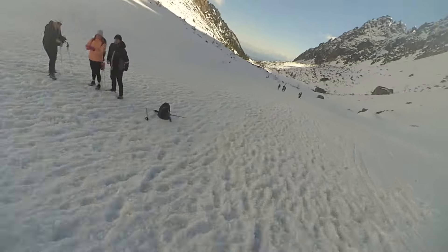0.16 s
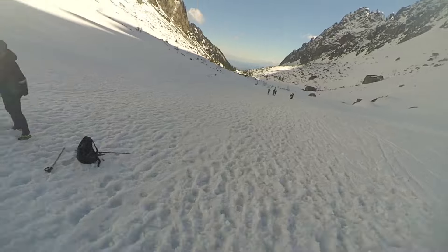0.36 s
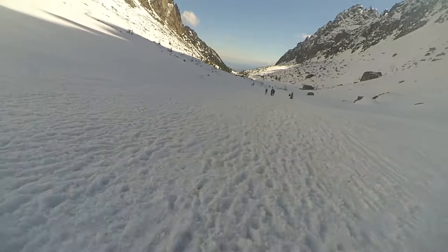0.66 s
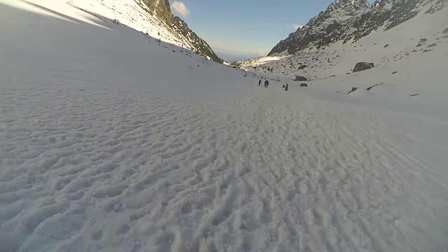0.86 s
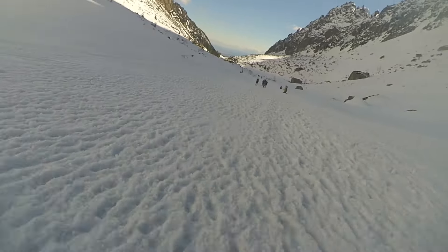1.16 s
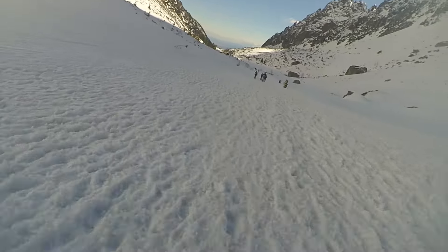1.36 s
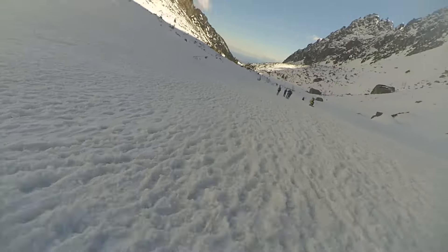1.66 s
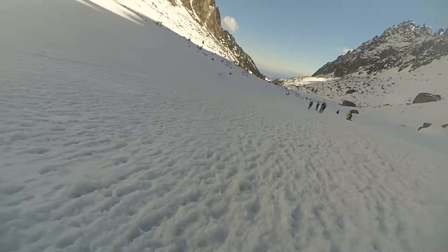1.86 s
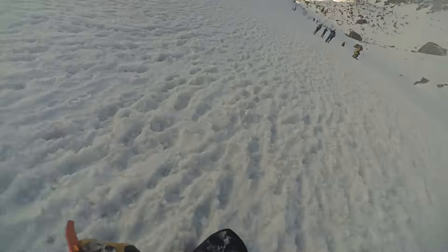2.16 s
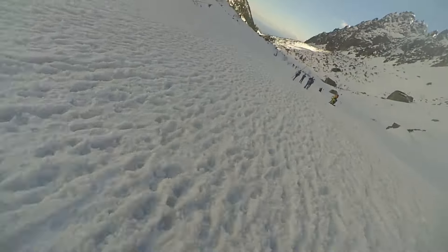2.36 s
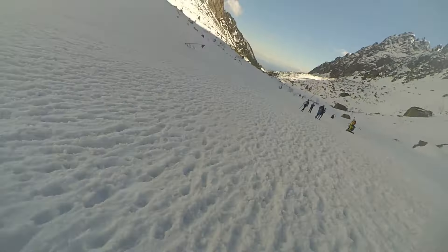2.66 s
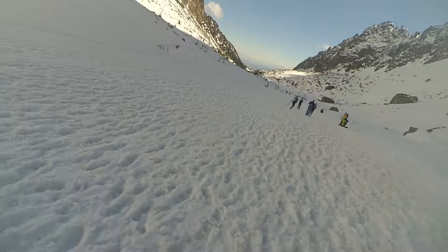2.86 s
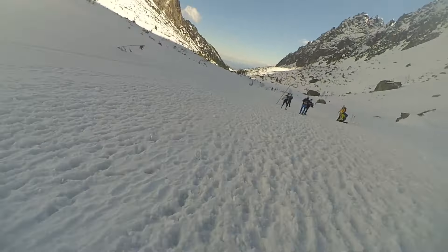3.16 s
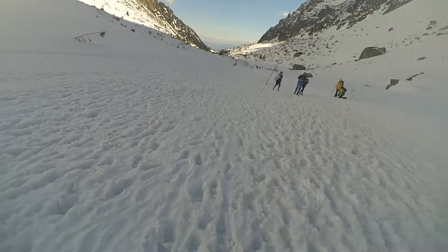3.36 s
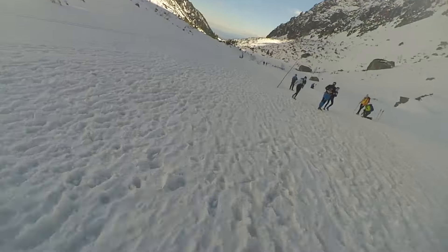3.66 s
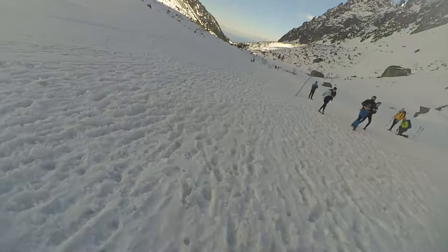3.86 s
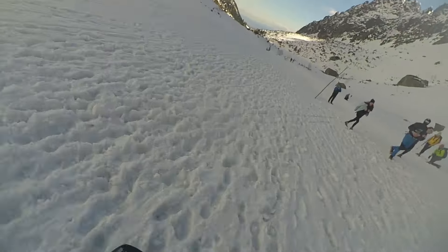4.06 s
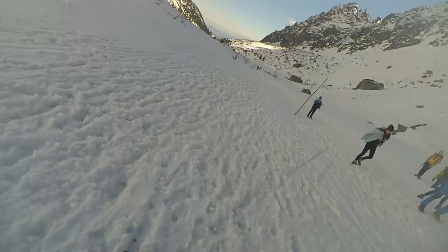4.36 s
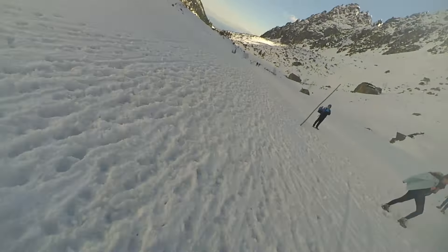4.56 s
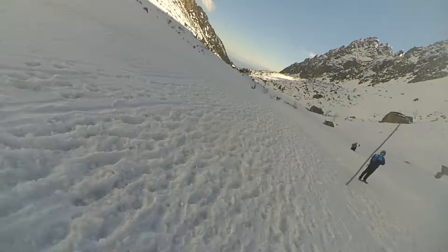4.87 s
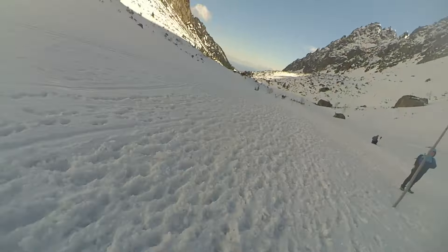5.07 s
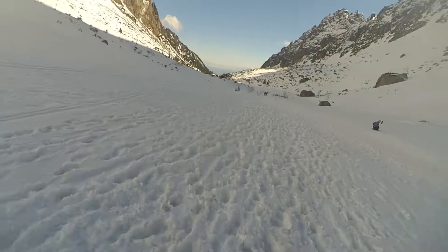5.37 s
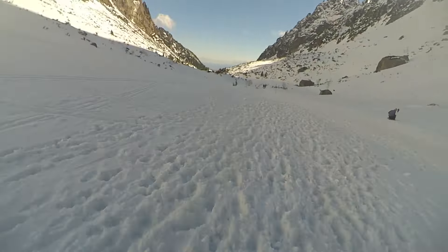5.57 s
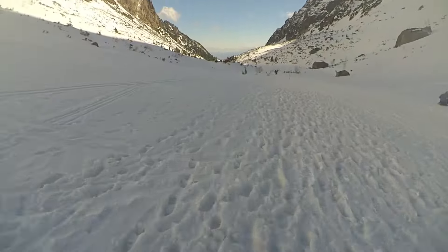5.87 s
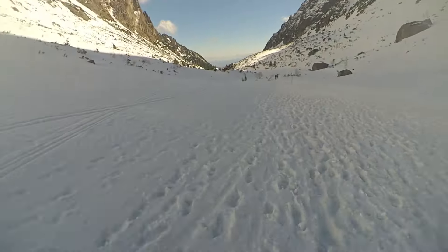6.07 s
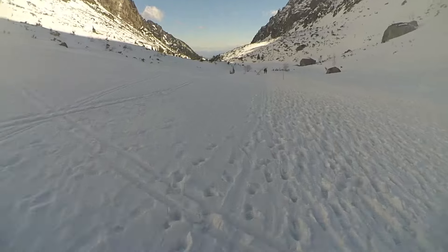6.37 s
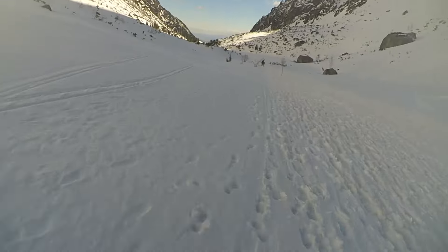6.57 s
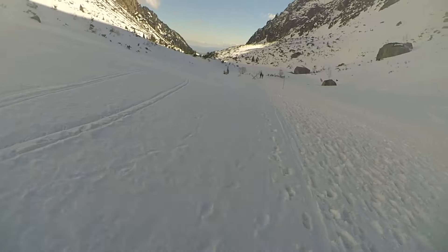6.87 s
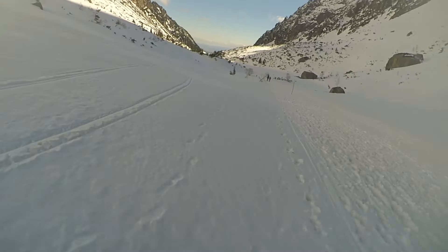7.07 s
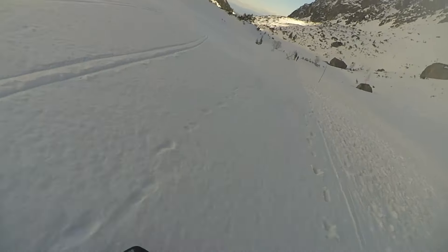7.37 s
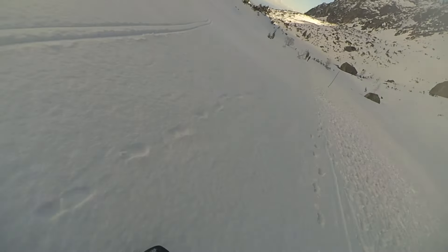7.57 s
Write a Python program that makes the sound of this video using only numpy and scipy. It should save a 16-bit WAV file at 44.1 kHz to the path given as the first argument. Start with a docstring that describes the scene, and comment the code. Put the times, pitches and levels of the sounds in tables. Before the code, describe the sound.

A skier carves over trampled, crusty snow in the open, heard nearly mono from a small microphone in a closed case. From 0 to 1 s, grainy hiss and low scraping run under a burst of dry crust cracks, with wind slapping the case. Around 1.1 s the turn changes and the hiss becomes brighter and smoother, swelling to its strongest near 2-2.4 s, while deep gusts thump hard at about 1.6-2.1 s. From 2.7 s the hiss is duller and rougher, with a board bump near 2.9 s. The brighter edge sound returns at 3.6 s, rising around 4.4 s with another heavy gust at 4.5 s. After 5.1 s it is grainier and quieter, with a bump, brief skips and scattered cracks. From 6.6 s the cracks stop after one last snap; soft hiss, faint scrape and a subdued rumble continue to 7.6 s.

```python
"""Skiing over crusty snow

A skier swings from turn to turn over trampled, crusty snow with a small camera in a closed case.
Wind pumps the case in a deep rumble: noise bands under drawn gusts, with a patchy drone.
Skis hiss, drag and shudder with edge load: noise, part smooth and part snapping grains.
Breaking crust cracks in short noise puffs. Each turn rings the case from its own side,
so hiss and cracks take that turn's own resonances."""
import sys
import numpy as np
from scipy import signal
from scipy.fft import rfft, irfft, next_fast_len
from scipy.io import wavfile
from scipy.ndimage import uniform_filter1d

SR = 44100
rng = np.random.default_rng(int(sys.argv[2]) if len(sys.argv) > 2 else 0)


def store_wav(level_fs):
    """Save 16-bit WAV to argv[1]."""
    pcm = np.round(np.clip(np.atleast_2d(level_fs), -1, 1) * 32767)
    wavfile.write(sys.argv[1], SR, pcm.T.astype(np.int16))


N = 340011

# Relative spectra of the wind in the case, deep to higher [f/Hz, level/dB per Hz]
HEAVE_SPECTRUM = [(3, -7.5), (5, 2), (14, 1), (20, -12), (30, -36)]
THROB_SPECTRUM = [(10, -36.5), (18, 2.5), (34, -6.5), (46, -11), (65, -64)]
FLUTTER_SPECTRUM = [(30, -11), (45, -1), (62, -11), (84, -18.5), (110, -52)]
DRONE_SPECTRUM = [(65, -26), (88, -1), (114, -1), (140, -18.5), (180, -47)]
# Relative spectrum of the rumble that differs between the channels [f/Hz, level/dB per Hz]
TRACE_SPECTRUM = [(12, -21), (20, 13), (33, -10), (77, -26), (141, -45), (299, -55), (650, -64),
                  (1030, -75), (4000, -84), (5200, -114), (8800, -120)]
# Relative spectra of the shuddering boards and dragging skis [f/Hz, level/dB per Hz]
SHUDDER_SPECTRUM = [(110, -5), (150, 2), (210, 2.5), (300, -4), (420, -23.5)]
DRAG_SPECTRUM = [(200, -29), (350, -9), (580, -6.5), (720, -13.5), (900, -3), (1130, -0.5), (1350, -9),
                 (1800, -55)]
# Broad colour of the hiss in the one turn and the opposite turn [f/Hz, level/dB per Hz]
ONE_SPECTRUM = [(700, -23.5), (1300, -10.5), (1800, -4), (2600, -5), (3100, -11.5), (3600, -10),
                (4500, -14.5), (6000, -15), (8000, -22), (8500, -22.5), (10300, -22.5), (12000, -30),
                (15500, -37)]
OTHER_SPECTRUM = [(700, -33), (1300, -15), (1900, -14.5), (2500, -11.5), (3100, -15), (3600, -8.5),
                  (4500, -10), (4900, -17), (6000, -26.5), (7200, -33), (9500, -34), (12000, -39.5),
                  (15500, -43)]
# Case resonances in the one turn and the opposite turn [f/Hz, width/Hz, lift/dB]
ONE_MODES = [(1650, 140, 10.5), (2097, 234, 6.3), (3752, 1150, 14), (5330, 214, 8.7), (6515, 145, 9),
             (7390, 710, 5.4), (8080, 290, 4.6)]
OTHER_MODES = [(1570, 270, 7), (2170, 410, 5.9), (2803, 170, 11.3), (3856, 310, 8), (4285, 190, 7.5),
               (6580, 360, 8), (8340, 300, 3.4), (8900, 540, 6), (10700, 330, 2.5)]

# Slow pumping of the case by the wind [t/s, level/dB]
HEAVE_LEVEL = [(0, -24.5), (.97, -19), (1.09, -25.5), (1.42, -31.5), (1.6, -7.5), (1.87, -6), (1.97, -19),
               (2.1, -8.5), (2.4, -18.5), (2.6, -18), (2.75, -24.5), (2.88, -14.5), (3.18, -27.5),
               (3.52, -22), (3.95, -31.5), (4.12, -17.5), (4.27, -24), (4.51, -11), (4.74, -24),
               (5.22, -28), (5.37, -21.5), (6.4, -25.5), (6.75, -33.5), (7.6, -29.5)]
# Quicker flutter of the wind [t/s, level/dB]
FLUTTER_LEVEL = [(0, -34.5), (.6, -39.5), (.9, -36), (1.07, -44.5), (1.35, -35), (1.6, -31.5),
                 (1.95, -28.5), (2.4, -39.5), (2.58, -43.5), (2.75, -34), (2.9, -41.5), (2.99, -31.5),
                 (3.1, -41), (3.35, -28.5), (3.5, -41), (4.1, -30.5), (5.0, -40), (5.43, -39.5),
                 (5.62, -34.5), (6.05, -43), (6.21, -38), (6.59, -44), (7.05, -39), (7.6, -47)]
# Single wind slaps that make the case throb [middle t/s, level/dB]
SLAPS = [(.13, -29), (.36, -22.5), (.56, -22.5), (.88, -19.5), (1.45, -21.5), (1.6, -7.5), (1.75, -12),
         (1.97, -12.5), (2.36, -20), (2.8, -27.5), (3.02, -24), (3.28, -19), (4.0, -23.5), (4.27, -25),
         (4.51, -13.5), (4.8, -23.5), (5.37, -27.5), (5.6, -21.5), (6.31, -29), (6.68, -27.5)]
# How hard the edges press the snow, as hiss level [t/s, level/dB]
LOAD = [(0, -39), (.6, -39.5), (.98, -39.5), (1.15, -39.5), (1.4, -38), (1.7, -36), (2.0, -33),
        (2.4, -33.5), (2.6, -40.5), (2.85, -40.5), (3.1, -44), (3.35, -41), (3.8, -45), (4.0, -40.5),
        (4.15, -40), (4.36, -36), (4.6, -41), (4.88, -40.5), (5.05, -46.5), (5.38, -42), (5.55, -41),
        (5.7, -42), (5.95, -42), (6.14, -40.5), (6.32, -43.5), (6.55, -46), (6.8, -50.5), (6.93, -45.5),
        (7.05, -47.5), (7.22, -42), (7.64, -44)]
# Brief skips of the skis off the snow [middle t/s, half length/s, drop/dB]
SKIPS = [(0.696, 0.043, 5), (1.053, 0.034, 4.5), (1.207, 0.018, 3.5), (2.349, 0.018, 2.5),
         (2.598, 0.043, 3), (3.65, 0.025, 6.5), (4.18, .03, 4), (5.086, 0.019, 2), (5.298, 0.024, 4),
         (5.474, 0.05, 5), (6.07, 0.042, 5), (6.218, 0.031, 8.5), (6.606, 0.0093, 4)]
# Turns [start t/s, side: 1 the one turn, 0 the opposite turn]
TURNS = [(0, 0), (1.12, 1), (2.72, 0), (3.6, 1), (5.12, 0), (6.6, 1)]
# Changing snow, levels at the middle load and flutter [t/s, drag level/dB, shudder level/dB]
SNOW = [(0, -56, -57.5), (1, -54.5, -57), (2.4, -55, -60.5), (3.4, -51.5, -57), (4.4, -53, -62.5),
        (5.6, -53.5, -61), (6.6, -54, -62), (7.6, -54, -60.5)]
# Bigger bumps under the boards [t/s, peak level/dB]
BUMPS = [(0.526, -41), (1.596, -44), (1.881, -50), (2.126, -49), (2.232, -51), (2.947, -35.5), (4.477, -48),
         (4.861, -44), (5.076, -39), (6.741, -44)]
# Breaking crust, each part before its lift [t/s, level of the top/dB, thud, body, ring against it/dB]
CRACKS = [(0.0714, -22.5, -25, -17, -6), (0.106, -22, -38, -18, -9), (0.138, -17.5, -40, -15, -12.5),
          (0.2394, -30, -19, -9, -6), (0.259, -32, -34, -18, -1), (0.3033, -30, -29, -10, -2),
          (0.39, -19, -34, -15, -12), (0.856, -23, -26, -18, -5), (0.9038, -29, -26, -21, -3),
          (0.9517, -22.5, -23, -16, -17), (1.0797, -22.5, -28, -17, -15), (1.7035, -19, -17.5, -7, -22),
          (1.9081, -17, -25, -10, -15), (1.944, -17, -29, -10.5, -10.5), (2.361, -28, -18, -2, -18),
          (2.6688, -27.5, -21, 1, -33), (2.7246, -26, -13, -9, -10), (2.7631, -24, -28, -14.5, -12),
          (2.8887, -26.5, -28, -8.5, -0.5), (3.0493, -30, -25, -10, -7.5), (3.3495, -27, -20, -7, -14),
          (3.4037, -22.5, -23, -16, -17), (3.57, -32, -15, -8, -2), (3.61, -19, -16.5, -13.5, -10),
          (3.6778, -30.5, -20, -10, -11), (3.9095, -29.5, -18, -4.5, -11), (3.9828, -26.5, -17, -12.5, -13),
          (4.0855, -27, -16, -16, -11), (4.2477, -22.5, -20, -8, -30), (4.6473, -33.5, -15, -2.5, -17),
          (4.8498, -31.5, -18, -3, -15), (4.868, -32, -25, -3, -30), (4.8926, -21.5, -20.5, -16.5, -19),
          (5.0665, -29, -21, -7.5, -10), (5.122, -28, -21, -15, -19), (5.2542, -26.5, -26, -34, -7.5),
          (5.5361, -30, -13, -13, 0.5), (5.799, -30.5, -34, -5, 0), (5.8666, -27.5, -36, -11, -4),
          (5.9184, -25.5, -27, -23, -4.5), (5.9834, -32, -20, -32, 1), (6.021, -35, -25, -18, -3),
          (6.127, -23.5, -19.5, -10, -12), (6.334, -31, -21, -10, -14), (6.5299, -22.5, -27, -15, -17),
          (6.6348, -24, -27, -16, -16)]
# Bands of thud, body, ring and sharp top [low f/Hz, high f/Hz]
CRACK_BANDS = [(400, 1000), (1400, 2700), (3400, 4600), (5200, 8000)]

MIDDLE_DB = -40  # load and flutter level that the followers below are set from
SLAP_S, THROB_OVER_FLUTTER_DB = 0.047, 5.5  # half length; throb between slaps
DRONE_DB, DRONE_PER_FLUTTER, DRONE_PER_LOAD = -52.5, 0.69, 0.91  # middle level; dB per dB
TRACE_DB = -11  # against the flutter
SHUDDER_PER_LOAD, SHUDDER_PER_FLUTTER = 0.81, 0.22  # dB per dB
BUMP_S, BUMP_DB = 0.016, -15  # half length; rms against the peak
DRAG_PER_LOAD, DRAG_BUMPS_DB, DRAG_FLICKER_DB = 0.81, 1.6, 1.6  # dB per dB; spreads
SWAP_S, SPLIT_HZ = 0.21, 2900  # time to change edges; corner between coarse and fine snow
# Each hiss against the load: in the opposite turn, in the one turn
ONE_DB, OTHER_DB = (-4.5, 1), (1, -12)
CRACK_BAND_DB = (1.5, 6, 3, -18)  # lift of thud, body, ring, top
CRACK_MS, CRACK_SPREAD = 2.4, 0.64  # decay and the random spread of its logarithm
TOP_HZ = 15400


def db_to_gain(db):
    """Decibels to amplitude gain."""
    return 10 ** (np.asarray(db) / 20)


def unit(x):
    """Scale to rms 1."""
    return x / np.sqrt(np.mean(x ** 2))


def columns(table):
    """Draw each column after the time as a line, one value a sample."""
    s, *rest = np.transpose(table)
    return [np.interp(np.arange(N) / SR, s, column) for column in rest]


def response(points, modes=()):
    """Causal response of power gain 1: spectrum plus resonance lifts, built from the cepstrum."""
    size = 1 << 16
    hz = np.maximum(np.arange(size // 2 + 1) * SR / size, 1)
    point_hz, point_db = np.transpose(points)
    db = np.interp(np.log(hz), np.log(point_hz), point_db, -90, -90)
    for centre_hz, width_hz, lift_db in modes:
        db = db + lift_db / (1 + (2 * (hz - centre_hz) / width_hz) ** 2)
    # Folding the cepstrum forward gives minimum phase
    cepstrum = irfft(db * np.log(10) / 20)
    cepstrum[1:size // 2] *= 2
    cepstrum[size // 2 + 1:] = 0
    ring = irfft(np.exp(rfft(cepstrum)))[:size // 2]
    return ring / np.linalg.norm(ring)


def colour(x, points, modes=()):
    """Filter through the response of a spectrum and its resonances."""
    return signal.fftconvolve(x, response(points, modes))[:len(x)]


def noise(points):
    """Coloured noise of rms 1, already running at the start."""
    return unit(colour(rng.standard_normal(N + SR), points)[SR:])


def walk(rate):
    """Random levels held 1 / rate s and slewed twice; spread 1."""
    hold = int(SR / rate)
    steps = np.repeat(rng.standard_normal(N // hold + 1), hold)
    slewed = uniform_filter1d(uniform_filter1d(steps, hold), hold)
    return unit(slewed[:N])


def even(x, seconds):
    """Bring the swings to a fairly even size by dividing out much of their envelope."""
    envelope = np.abs(signal.hilbert(x, next_fast_len(N))[:N])
    size = uniform_filter1d(envelope, int(seconds * SR))
    return unit(x / (size + .2))


def lumps(rows, half_s):
    """Power sum of bell-shaped swells, rows (middle s, dB), as an amplitude envelope."""
    t = np.arange(0, N, 32) / SR
    power = sum(db_to_gain(2 * db) * np.exp(-((t - s) / half_s) ** 2) for s, db in rows)
    return np.interp(np.arange(N) / SR, t, np.sqrt(power))


def load():
    """Pressure of the edges in dB; it drops as the skis skip off the snow."""
    t = np.arange(N) / SR
    drops_db = sum(db * np.exp(-((t - s) / half_s) ** 4) for s, half_s, db in SKIPS)
    return columns(LOAD)[0] - drops_db


def side():
    """1 in the one turn, 0 in the opposite turn, sliding between as the edges change."""
    starts, sides = np.transpose(TURNS)
    current = np.searchsorted(starts, np.arange(N) / SR, "right") - 1
    return uniform_filter1d(sides[current], int(SWAP_S * SR), mode="nearest")


def channel_trace():
    """Wind noise under the flutter, of opposite sign in the two channels."""
    trace = noise(TRACE_SPECTRUM) * db_to_gain(columns(FLUTTER_LEVEL)[0] + TRACE_DB)
    return trace * np.array([[1], [-1]])


def drone():
    """Case noise that follows wind and edge load in dB and comes in random patches."""
    flutter_over_db = columns(FLUTTER_LEVEL)[0] - MIDDLE_DB
    load_over_db = load() - MIDDLE_DB
    level_db = DRONE_DB + DRONE_PER_FLUTTER * flutter_over_db + DRONE_PER_LOAD * load_over_db
    return db_to_gain(level_db + 2.2 * walk(12)) * noise(DRONE_SPECTRUM)


def wind():
    """Gusts pump the case: slow heave, throb swelled by slaps, and quicker flutter."""
    (heave_db,), (flutter_db,) = columns(HEAVE_LEVEL), columns(FLUTTER_LEVEL)
    heave = db_to_gain(heave_db) * even(noise(HEAVE_SPECTRUM), 0.2)
    throb_gain = np.hypot(db_to_gain(flutter_db + THROB_OVER_FLUTTER_DB), lumps(SLAPS, SLAP_S))
    throb = throb_gain * even(noise(THROB_SPECTRUM), 0.09)
    flutter_gain = db_to_gain(flutter_db + 0.17 * walk(14))
    flutter = flutter_gain * even(noise(FLUTTER_SPECTRUM), 0.11)
    return heave + throb + flutter


def shudder(bumps):
    """Low noise of the boards: steady under load and wind, swelling at bigger bumps."""
    load_over_db = load() - MIDDLE_DB
    flutter_over_db = columns(FLUTTER_LEVEL)[0] - MIDDLE_DB
    level_db = columns(SNOW)[1] + SHUDDER_PER_LOAD * load_over_db
    level_db = level_db + SHUDDER_PER_FLUTTER * flutter_over_db
    steady = db_to_gain(level_db + 1.7 * bumps + 0.94 * walk(20))
    middles = [(s + BUMP_S / 2, db) for s, db in BUMPS]
    hits = db_to_gain(BUMP_DB) * lumps(middles, BUMP_S)
    return noise(SHUDDER_SPECTRUM) * np.hypot(steady, hits)


def crunch(rate, spread_db, ms):
    """Envelope of snow grains snapping at random: many small, a few large, each a short puff."""
    when, size = rng.random(N), rng.exponential(size=N)
    starts = (when < rate / SR) * db_to_gain(2 * spread_db * np.minimum(size, 4))
    decay = np.exp(-1000 / (ms * SR))
    power = signal.lfilter([1], [1, -decay], starts)  # powers of overlapping puffs add
    return unit(np.sqrt(power))


def hiss(db, spectrum, modes, flicker_db, grainy):
    """Sliding noise, part smooth and part grains; coarse and fine snow clump on their own."""
    share = np.clip(grainy, 0, 1)
    low_pass = signal.butter(2, SPLIT_HZ, fs=SR, output="sos")
    common = crunch(260, 0.87, 1.17)
    mixed = 0
    for fine, ms in ((False, 5.0), (True, 3.0)):
        grains = (common + crunch(80, 3.9, ms)) / 2
        envelope = (1 - share + share * grains) * db_to_gain(flicker_db * walk(60))
        grit = rng.standard_normal(N) * envelope
        coarse = signal.sosfiltfilt(low_pass, grit)
        mixed = mixed + (grit - coarse if fine else coarse)
    return colour(mixed * db_to_gain(db), spectrum, modes)


def drag(bumps):
    """Low grainy scrape that follows snow, edge load and the bumps of the track."""
    level_db = columns(SNOW)[0] + DRAG_PER_LOAD * (load() - MIDDLE_DB) + DRAG_BUMPS_DB * bumps
    return hiss(level_db, DRAG_SPECTRUM, (), DRAG_FLICKER_DB, 0.5)


def turn_hisses(bumps):
    """Edges hiss with the load; each turn brings up its own colour and case resonances."""
    load_db, turn = load(), side()
    one_db, other_db = (load_db + off + (on - off) * turn for off, on in (ONE_DB, OTHER_DB))
    one = hiss(one_db + 0.36 * bumps, ONE_SPECTRUM, ONE_MODES, 0.89, 0.46)
    other = hiss(other_db + 0.91 * bumps, OTHER_SPECTRUM, OTHER_MODES, 0.81, 0.85)
    return one + other


def crack_ring(low_hz, high_hz, modes, length):
    """Response of the case to a crack in one band, with the resonances of a turn."""
    points = [(low_hz / 1.62, -30), (low_hz, 0), (high_hz, -3), (high_hz * 1.37, -22), (high_hz * 2, -36)]
    return response(points, modes)[:length]


def cracks():
    """Crust breaks in sharp puffs of random pushes, ringing the case as thud, body, ring and top."""
    out, t = np.zeros(N + SR), np.arange(SR // 25) / SR
    rings = [[crack_ring(low_hz, high_hz, modes, len(t)) for low_hz, high_hz in CRACK_BANDS]
             for modes in (OTHER_MODES, ONE_MODES)]
    turn = side()
    pushes = rng.standard_normal((len(CRACKS), len(t) + 1))
    for (s, peak_db, *shares_db), (luck, *push) in zip(CRACKS, pushes):
        start = int(s * SR)
        decay_ms = CRACK_MS * np.exp(CRACK_SPREAD * luck)
        attack = 1 - np.exp(-t / 0.0008)
        decay = np.exp(-1000 * t / decay_ms) + 0.07 * np.exp(-t / 0.015)  # crumbs trail after
        puff = push * attack * decay
        turn_rings = rings[int(turn[start] > .5)]
        for ring, share_db, lift_db in zip(turn_rings, (*shares_db, 0), CRACK_BAND_DB):
            part = signal.fftconvolve(puff, ring)[:len(t)]
            gain = db_to_gain(peak_db + share_db + lift_db)
            out[start:][:len(t)] += gain * part / np.abs(part).max()
    return out[:N]


def scene():
    """One microphone feeds both channels; only a trace of the rumble differs."""
    soft_start = np.minimum(np.arange(N) / (.02 * SR), 1)
    rumble = .9 * np.tanh((wind() + drone()) / .9) * soft_start  # the membrane stiffens
    bumps = walk(30)  # unevenness of the track, felt by all ski sounds
    skis = shudder(bumps) + drag(bumps) + turn_hisses(bumps)
    return channel_trace() + rumble + skis + cracks()


def record(dry):
    """Cut the top steeply with an elliptic low-pass."""
    low_pass = signal.ellip(10, .2, 60, TOP_HZ, fs=SR, output="sos")
    return signal.sosfilt(low_pass, dry)


dry = scene()
out = record(dry)
store_wav(out)
```